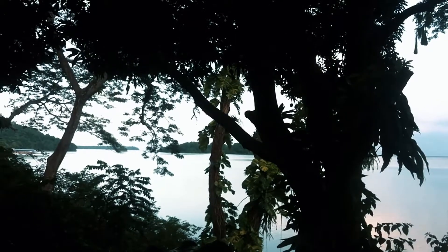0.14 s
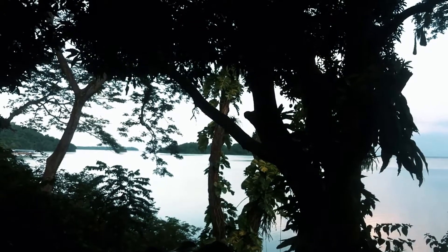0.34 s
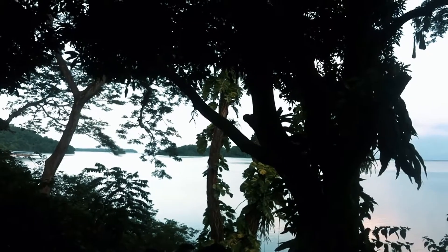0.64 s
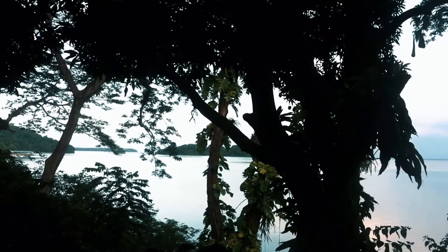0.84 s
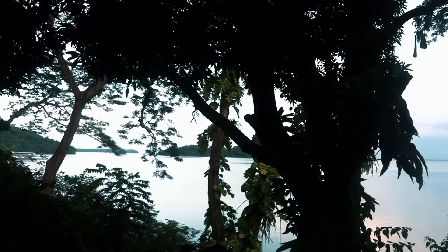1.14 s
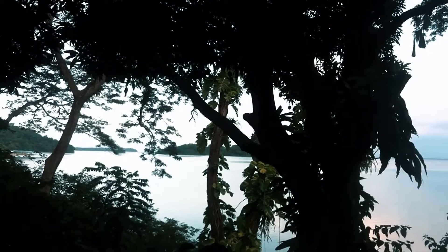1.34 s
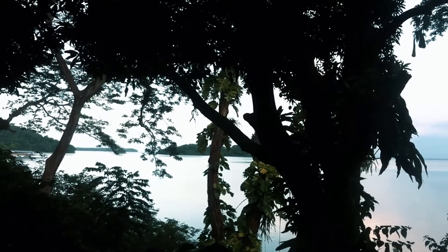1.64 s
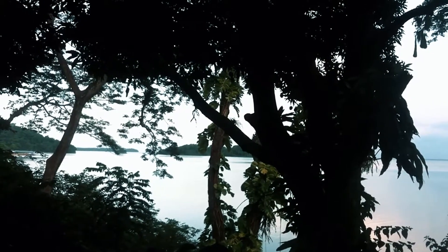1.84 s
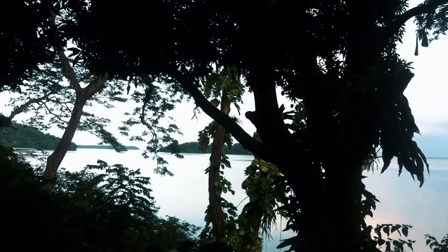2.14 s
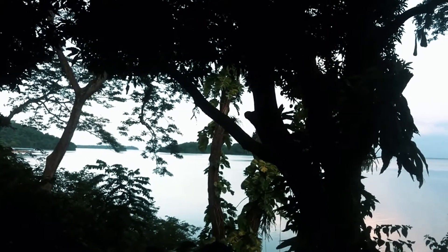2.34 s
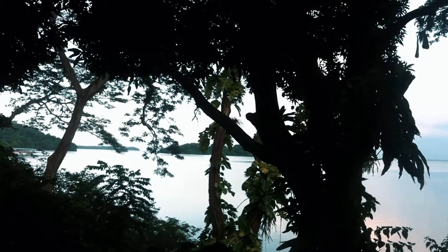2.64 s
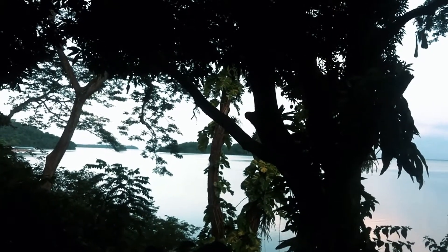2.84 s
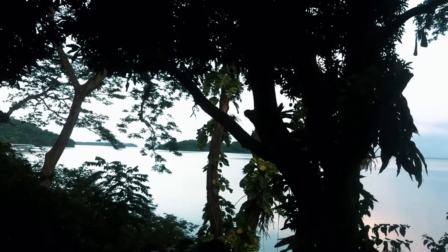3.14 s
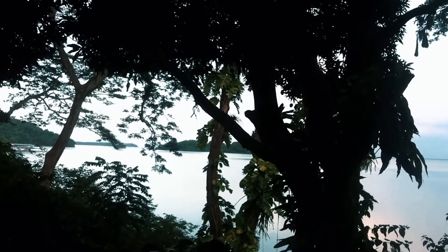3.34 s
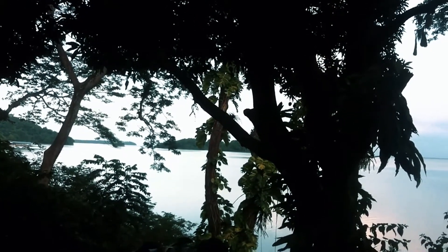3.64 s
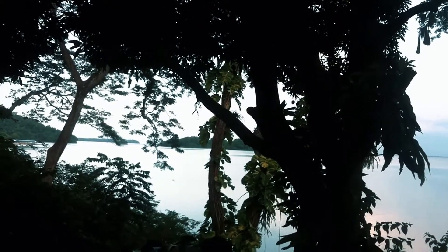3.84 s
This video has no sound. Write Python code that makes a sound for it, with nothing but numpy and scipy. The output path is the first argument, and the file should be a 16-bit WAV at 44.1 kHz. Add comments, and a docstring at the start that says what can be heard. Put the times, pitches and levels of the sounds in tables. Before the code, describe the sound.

Raspy bird whistles and broken, squeaky chatter among trees, with insects hissing steadily behind.

```python
"""In lakeside trees at dusk, an oropendola calls over a steady hiss of insects and distant air.
A few soft clucks lead to three loud, raspy whistles, then to a broken chatter of squeaks and gurgles.
Each is a trembling tone from the bird's voice box, roughened by puffs of air.
A second bird calls once, far off; the trees scatter both voices back."""
import sys
import numpy as np
from scipy import signal
from scipy.fft import rfft, irfft
from scipy.io import wavfile
from scipy.ndimage import uniform_filter1d

SR = 44100
rng = np.random.default_rng(int(sys.argv[2]) if len(sys.argv) > 2 else 0)


def to_wav(s):
    """Save 16-bit WAV."""
    ch = np.atleast_2d(s).T  # columns
    pcm = np.round(np.clip(ch, -1, 1) * 32767)  # PCM
    wavfile.write(sys.argv[1], SR, pcm.astype(np.int16))


N = 176400  # 4 seconds

# Tone colour of the insects and of the distant air: pitch_hz, relative_db
INSECT_COLOUR = [(2470, -65), (4200, -24), (4640, -14.5), (5090, -13.5), (6160, -3), (6950, -13.5),
                 (7970, 2), (8700, -4.5), (9450, 0), (9820, -0.5), (11100, -15), (13500, -9.5),
                 (15600, -16)]
AIR_COLOUR = [(15, -55), (30, -20.5), (150, -7), (400, -7), (600, -11), (4200, -14.5), (6500, -85)]
# Clucks: start_s, length_s, from_hz, to_hz, level_db, rasp_db
CLUCK_NOTES = [(0.036, .017, 1395, 1230, -59.5, -15), (0.409, 0.011, 1450, 1200, -54, -3.5),
               (0.97, 0.025, 1558, 1210, -59, -2), (1.373, 0.026, 1666, 1490, -65, 6.5),
               (1.702, 0.018, 1710, 1174, -57.5, 1.5), (1.897, 0.023, 1400, 1085, -58.5, 8),
               (2.183, 0.023, 1720, 1154, -68, 17), (2.466, 0.017, 1994, 1133, -54, 9),
               (2.517, 0.021, 1528, 1710, -61.5, 12.5), (2.682, 0.018, 1860, 1550, -51.5, 0),
               (2.727, 0.039, 1412, 1277, -59.5, -7), (2.767, 0.023, 1443, 1153, -56.5, 10),
               (2.967, 0.02, 1452, 1810, -48, -4), (3.184, 0.0202, 2295, 1800, -48.5, -6.5),
               (3.273, 0.019, 1510, 1657, -50, -25), (3.397, 0.0285, 1895, 1360, -60, -2),
               (3.346, 0.016, 1343, 1870, -52.5, -2), (3.552, 0.015, 1456, 1850, -45.5, -9),
               (3.754, 0.0097, 1416, 2190, -52, 5), (3.841, 0.016, 1320, 2200, -50, -13)]
# Tone colour of the breathy rasp in low notes and in high notes: pitch_hz, relative_db
LOW_RASP = [(100, -20), (600, -5.5), (3000, 3.5), (5000, -14.5), (15000, -4.5)]
HIGH_RASP = [(100, -55), (1400, -17), (2600, 6), (3800, 0), (4800, 9), (10000, -1), (13200, 4),
             (14300, -17), (15500, 0.5)]
# Time the echoes in the trees take to fade by 60 dB: pitch_hz, fade_s
TREE_FADES = [(1300, 0.59), (2300, 0.58), (3300, 0.6), (6000, 0.74), (13000, 0.73)]
# Parts of the far bird's call: start_s, length_s, pitch_hz, level_db
FAR_NOTES = [(0.465, 0.038, 3940, -55), (0.589, 0.14, 3850, -60), (0.631, 0.17, 4530, -59)]
# Squeaks; the rows at 11 kHz and above are thin, high overtones of lower notes:
# start_s, length_s, from_hz, middle_hz, to_hz, level_db
SQUEAKS_AND_OVERTONES = [(1.364, 0.019, 3420, 3270, 3000, -59), (2.252, 0.011, 4850, 5270, 5030, -41.5),
                         (2.45, 0.026, 3234, 3590, 2470, -47.5), (2.688, .033, 3250, 3960, 3290, -41),
                         (2.729, 0.053, 3484, 3700, 2900, -51.5), (2.971, 0.035, 2868, 3710, 3590, -43.5),
                         (3.002, 0.046, 4976, 5220, 4820, -45.5), (2.98, 0.039, 11000, 11200, 11250, -55),
                         (3.021, 0.027, 3525, 3764, 2910, -48), (3.275, 0.036, 2750, 4015, 3150, -45.5),
                         (3.291, 0.029, 4800, 4994, 5000, -46), (3.354, 0.015, 2580, 3470, 3170, -47.5),
                         (3.363, 0.045, 4870, 5120, 4870, -48.5), (3.375, 0.022, 5930, 6540, 6190, -45.5),
                         (3.534, 0.073, 11800, 12050, 12400, -55.5),
                         (3.551, 0.053, 3130, 3700, 3110, -49.5), (3.567, 0.0408, 4974, 5030, 4825, -46),
                         (3.606, 0.013, 2280, 2044, 1960, -46), (3.757, 0.019, 2330, 3690, 3430, -49.5),
                         (3.76, 0.062, 4750, 5040, 5220, -52.5), (3.784, 0.027, 5990, 6740, 6380, -49),
                         (3.8, 0.021, 3660, 3690, 2560, -59), (3.85, .016, 3000, 3666, 3580, -44),
                         (3.866, 0.033, 4630, 4850, 4650, -50), (3.92, 0.077, 11100, 12100, 13000, -59.5)]
# How strongly the beak lets out a squeak's overtones: pitch_hz, relative_db
BEAK_COLOUR = [(4500, -5), (7400, -19.5), (10000, -2), (11200, -19.5), (13000, -9), (15300, -19.5)]
# Notes that run together, three to a whistle:
# start_s, length_s, pitch_hz, scoop_fraction, level_db, overtones_db, rasp_db
WHISTLE_NOTES = [(1.794, 0.046, 3238, 0.35, -41.5, -18, -13.5), (1.831, 0.08, 3297, .05, -43.5, -13, -9),
                 (1.883, 0.1, 3360, 0.13, -40.5, -17.5, -13.5), (2.133, 0.056, 3230, 0.4, -39, -16, -11.5),
                 (2.183, 0.073, 3325, 0.19, -39.5, -15.5, -10),
                 (2.252, 0.051, 3422, 0.04, -35.5, -15.5, -18), (2.495, .056, 3182, 0.1, -39, -15, -9.5),
                 (2.566, 0.042, 3196, 0.22, -36.5, -13, -12.5),
                 (2.609, 0.058, 3203, 0.16, -35, -15.5, -15.5)]
# Extra strength of a whistle's overtones at 2, 3 and 4 times its pitch: boost_db
OVERTONE_BOOSTS = [1.5, 0.5, 0.5]
# Gurgles: flip_s, hold_s, top_hz, base_level_db
GURGLE_NOTES = [(3.071, 0.0076, 1750, -33.5), (3.119, 0.018, 2189, -33), (3.381, 0.029, 2323, -38),
                (3.482, 0.039, 2173, -38), (3.668, 0.031, 2454, -35), (3.893, 0.012, 2294, -35.5),
                (3.954, 0.025, 2518, -37.5)]


def amp(db):
    """Turns decibels into a volume factor."""
    return 10 ** (np.asarray(db) / 20)


def unit(sound):
    """Scales a sound to an average strength (rms) of 1."""
    return sound / np.sqrt(np.mean(sound ** 2) + 1e-20)


def look_up(table, hz):
    """Reads a table's value at any pitch."""
    pitches, values = np.transpose(table)
    return np.interp(np.log(hz + 1), np.log(pitches + 1), values)


def wander(n, speed_hz):
    """A smooth random wobble, up to about speed_hz."""
    hz = np.fft.rfftfreq(SR // 2, 1 / SR)
    spectrum = rfft(rng.standard_normal(SR // 2))
    return unit(irfft(spectrum * np.exp(-0.5 * (hz / speed_hz) ** 2)))[:n]


def noise(n, colour):
    """A short noise with the given tone colour."""
    hz = np.fft.rfftfreq(SR // 2, 1 / SR)
    spectrum = rfft(rng.standard_normal(SR // 2))
    return unit(irfft(spectrum * amp(look_up(colour, hz))))[:n]


def fade(t, in_s, out_s=0.0072):
    """Fades a note in and out."""
    rise = np.sin(np.pi / 2 * np.clip(t / in_s, 0, 1))
    fall = np.sin(np.pi / 2 * np.clip((t[-1] - t) / out_s, 0, 1))
    return rise * fall


def steady_hiss(colour, level_db, swell_db):
    """Insects or distant air: noise whose bands swell and fade in small patches."""
    hz = np.fft.rfftfreq(2048, 1 / SR)
    real, imaginary, patches = rng.standard_normal((3, len(hz), N // 512 + 6))
    patches = uniform_filter1d(patches, size=24, axis=0)  # smooth across pitch
    patches = unit(uniform_filter1d(patches, size=7, axis=1))  # and across time
    spectrum = (real + 1j * imaginary) * amp(look_up(colour, hz)[:, None] + swell_db * patches)
    return amp(level_db) * unit(signal.istft(spectrum, nperseg=2048, noverlap=1536)[1][:N])


def voice_box(hz, overtones_db, rasp_db, colour, tremble, flutter_db, fuzz_db=-17.5):
    """A trembling tone with overtones, a fuzzy band just under it, and air puffed out on each cycle."""
    n = len(hz)
    hz = hz * (1 + tremble * wander(n, 302))
    phase = 2 * np.pi * np.cumsum(hz) / SR
    tone = sum(amp(db) * np.sin(k * phase) * (k * hz < SR / 2)
               for k, db in enumerate([0, *overtones_db], 1))
    fuzz = sum(wander(n, 210) * wave(0.92 * phase) for wave in (np.sin, np.cos))
    rasp = amp(rasp_db) * noise(n, colour) * (1 + 0.29 * np.cos(phase))
    flutter = amp(flutter_db * wander(n, 128))
    return (np.sqrt(2) * tone + amp(fuzz_db) * fuzz + rasp) * flutter


def cluck(start_s, length_s, from_hz, to_hz, level_db, rasp_db):
    """A short, hoarse slide in pitch."""
    t = np.arange(0, length_s, 1 / SR)
    hz = from_hz + (to_hz - from_hz) * t / length_s
    overtone_db = -6 - 28 * np.log2(from_hz / 1400)  # weaker in higher clucks
    voice = voice_box(hz, [overtone_db], rasp_db, LOW_RASP, tremble=0.0704, flutter_db=1.6)
    return start_s, amp(level_db) * fade(t, in_s=0.011) * voice


def tree_echoes(sound, fades):
    """Trunks and leaves scatter the sound; the table says how fast each pitch dies away."""
    echoes = rng.standard_normal(SR) * (rng.random(SR) < 0.08)
    echoes *= np.arange(SR) > 0.003 * SR  # none in the first 3 ms
    hz, t, spectrum = signal.stft(echoes, SR, nperseg=256)
    decay = amp(-60 * t / look_up(fades, hz)[:, None])
    tail = signal.istft(spectrum * decay, SR, nperseg=256)[1]
    return signal.fftconvolve(sound, tail / np.linalg.norm(tail))[:N]


def far_call(start_s, length_s, pitch_hz, level_db):
    """A faint, buzzy note that sags in pitch."""
    t = np.arange(0, length_s, 1 / SR)
    hz = pitch_hz - 1590 * (t - length_s / 2) + 147 * wander(len(t), 190)
    phase = 2 * np.pi * np.cumsum(hz) / SR
    return start_s, amp(level_db) * fade(t, in_s=0.0072, out_s=0.028) * np.sin(phase)


def squeak(start_s, length_s, from_hz, middle_hz, to_hz, level_db):
    """A thin, rough bend of pitch, coloured by the beak: a squeak, or a lower note's high overtone."""
    t = np.arange(0, length_s, 1 / SR)
    bend_in = (from_hz - middle_hz) * np.exp(-(t / (length_s * 0.267)) ** 2)
    bend_out = (to_hz - middle_hz) * np.exp((t - length_s) / 0.00556)
    overtones_db = look_up(BEAK_COLOUR, middle_hz * np.arange(2, 4))
    voice = voice_box(middle_hz + bend_in + bend_out, overtones_db,
                      rasp_db=-11, colour=HIGH_RASP, tremble=0.015, flutter_db=3.22)
    return start_s, amp(level_db) * fade(t, in_s=0.012) * voice


def whistle(start_s, length_s, pitch_hz, scoop_fraction, level_db, overtones_db, rasp_db):
    """A note that scoops up, climbs slowly and droops at the end."""
    t = np.arange(0, length_s, 1 / SR)
    scoop = scoop_fraction * np.exp(-(t / 0.00563) ** 1.44)
    climb_hz = 570 * (t - length_s / 2)
    droop = 0.15 * np.exp((t - length_s) / 0.0035)
    catch = np.clip(wander(len(t), 84) - 0.9, 0, 1)  # brief dips in both pitch and loudness
    hz = (pitch_hz + climb_hz) * (1 - scoop - droop) * (1 - 0.049 * catch)
    voice = voice_box(hz, overtones_db + np.array(OVERTONE_BOOSTS), rasp_db, HIGH_RASP,
                      tremble=0.0015, flutter_db=0.61, fuzz_db=-11.5)
    return start_s, amp(level_db - 5.5 * catch) * fade(t, in_s=0.022) * voice


def gurgle(flip_s, hold_s, top_hz, base_level_db):
    """A soft low note creeps upward, then flips to a louder, clear one."""
    lead_s = 0.03
    t = np.arange(-lead_s, hold_s, 1 / SR)
    flipped = 0.5 + 0.5 * np.tanh(t / 0.0054)  # goes from 0 to 1 around t = 0
    low_hz = 1437 + 5100 * t
    hz = low_hz * (1 - flipped) + top_hz * flipped
    voice = voice_box(hz, [], rasp_db=-18, colour=LOW_RASP, tremble=0.019, flutter_db=3.1)
    level_db = base_level_db - 13.5 * (1.5 - flipped ** 2)
    return flip_s - lead_s, amp(level_db) * fade(t + lead_s, in_s=0.025) * voice


def play(source, notes):
    """Places each note of a table at its start time."""
    track = np.zeros(N)
    for note in notes:
        start_s, sound = source(*note)
        slot = track[max(round(start_s * SR), 0):][:len(sound)]
        slot += sound[:len(slot)]
    return track


def scene():
    """Mixes the near bird, its echoes, the far bird (heard only as echoes), insects and air."""
    high = play(whistle, WHISTLE_NOTES) + play(squeak, SQUEAKS_AND_OVERTONES)
    low = play(cluck, CLUCK_NOTES) + play(gurgle, GURGLE_NOTES)
    far = play(far_call, FAR_NOTES)
    long_echo = amp(-1) * tree_echoes(high + far + amp(-4.5) * low, TREE_FADES)
    short_echo = amp(-5) * tree_echoes(high + far + low, [(1, 0.31)])  # 0.31 s at every pitch
    insects = steady_hiss(INSECT_COLOUR, level_db=-58.5, swell_db=1.7)
    air = steady_hiss(AIR_COLOUR, level_db=-66.5, swell_db=2)
    return (high + low + long_echo + short_echo + insects + air)[None]


def record(dry):
    """Cuts away the treble above 15700 Hz."""
    treble_cut = signal.firwin(511, 15700, window=("kaiser", 9), fs=SR)
    return signal.oaconvolve(dry, treble_cut[None], "same")


dry = scene()
out = record(dry)
to_wav(out)
```